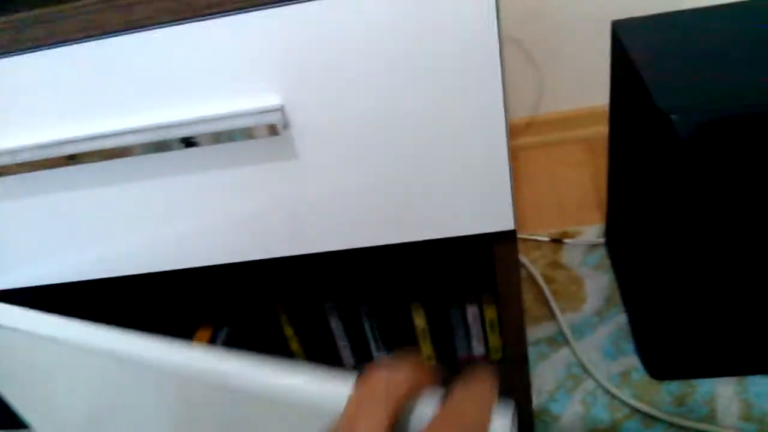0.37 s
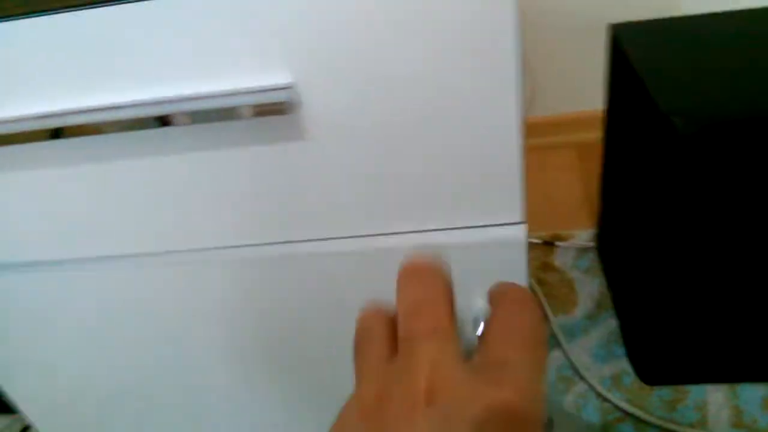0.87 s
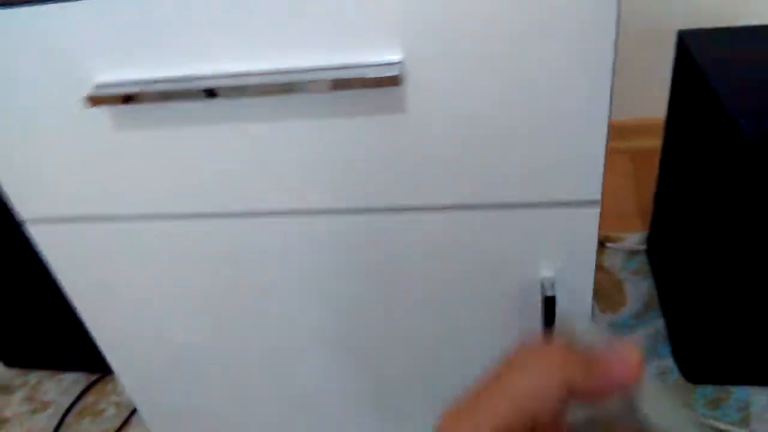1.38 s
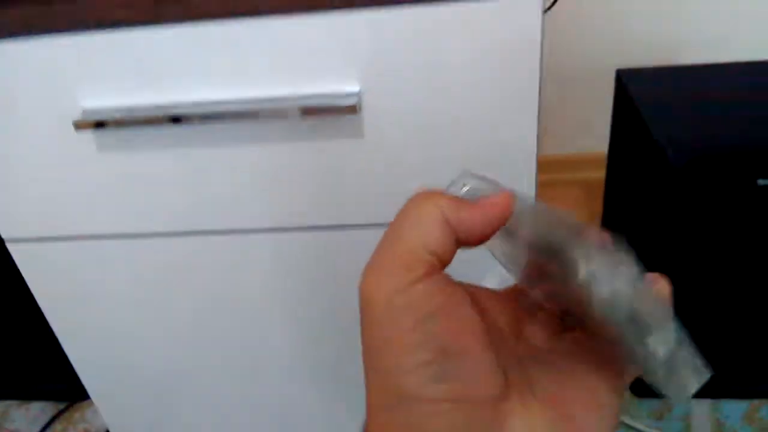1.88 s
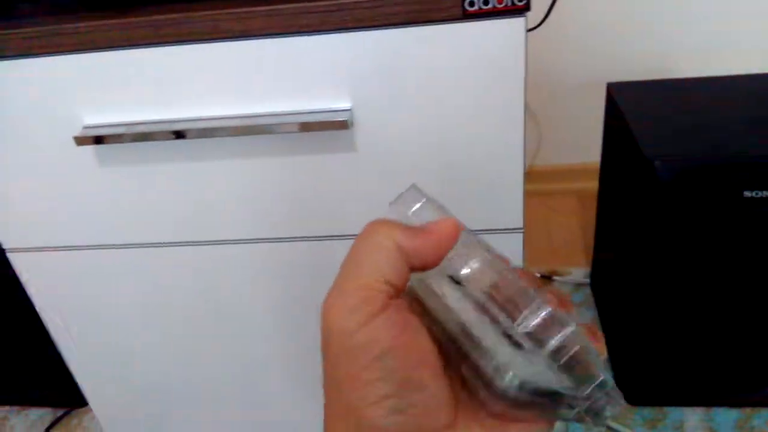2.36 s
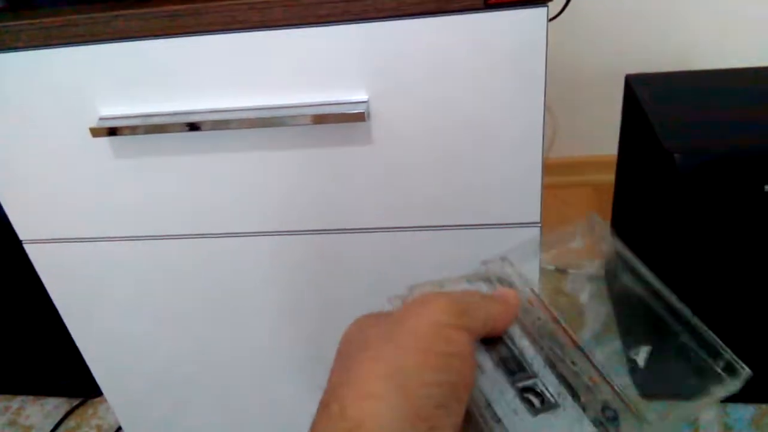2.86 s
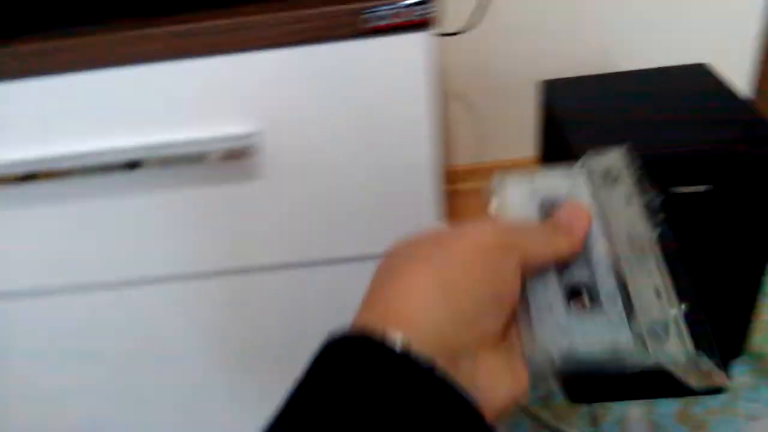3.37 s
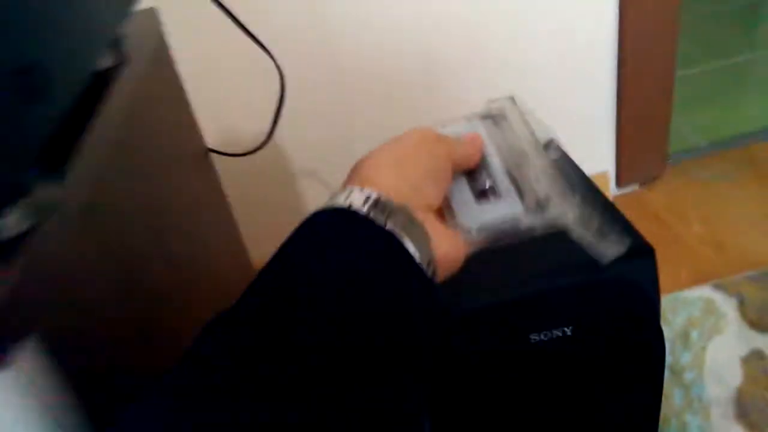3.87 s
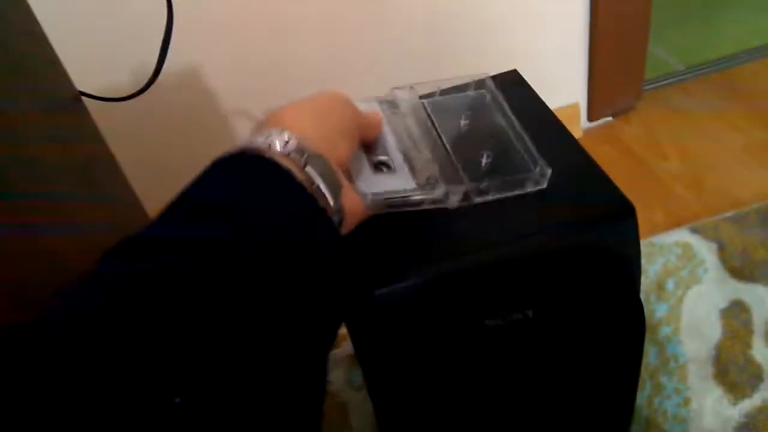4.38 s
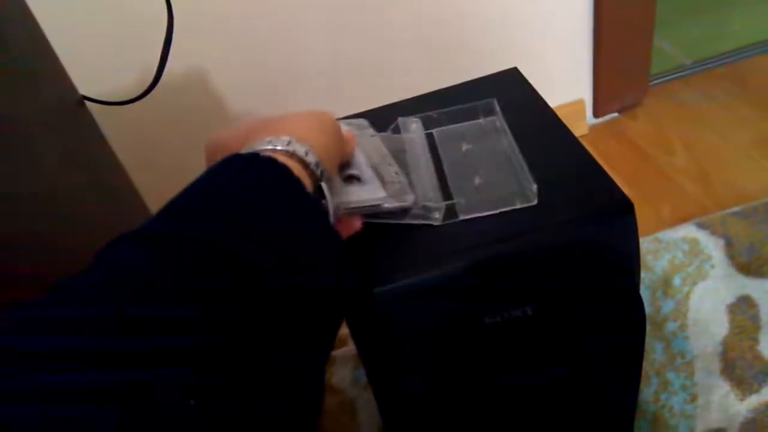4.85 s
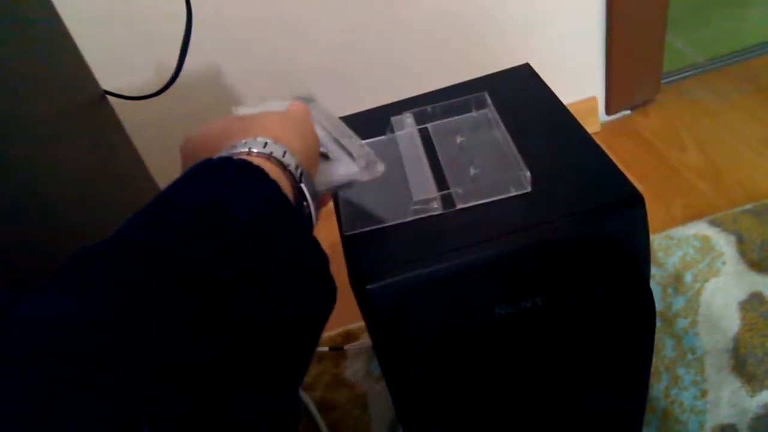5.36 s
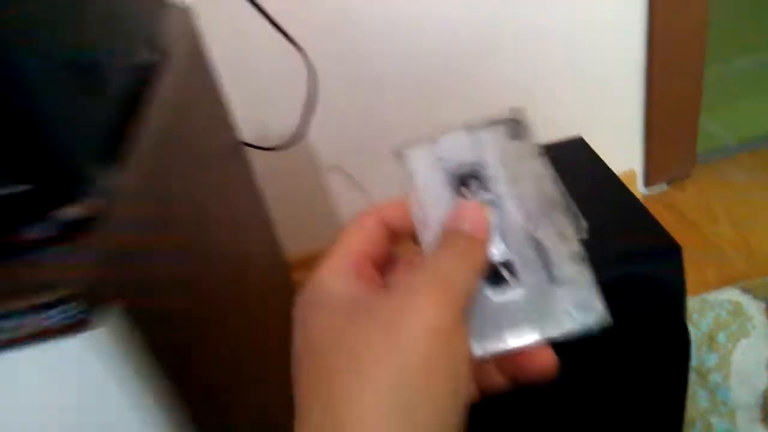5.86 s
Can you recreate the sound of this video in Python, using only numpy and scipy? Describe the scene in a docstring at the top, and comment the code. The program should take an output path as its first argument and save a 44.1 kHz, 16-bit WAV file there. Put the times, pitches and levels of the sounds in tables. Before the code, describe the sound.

In a small hard room, a cabinet door gives a faint knock, then slams loudly with a cracking, hollow thud. A hand lightly taps and turns a thin plastic cassette case, snaps it open, sets it on a hollow box and slides the cassette out with soft scrapes and clicks. A distant fan hums throughout under faint hiss and a thin high whine. Close handheld stereo microphone.

```python
"""A panel door knocks, swings and slams shut on its cabinet in a small hard room: noisy cracks set
its panel and cavity ringing. Then a hand turns a thin plastic cassette case, snaps it open, sets it on a
hollow box and slides the cassette out: tiny impacts and rubbing grains excite the plastic's resonances.
A fan hums and rushes far off in tones and noise, under a thin high whine that flickers."""
import sys
import numpy as np
from scipy import signal
from scipy.fft import rfft, irfft
from scipy.io import wavfile

SR = 44100
rng = np.random.default_rng(int(sys.argv[2]) if len(sys.argv) > 2 else 0)


def gain_from_decibels(decibels):
    """Convert decibel values to linear amplitude factors."""
    exponent = np.asarray(decibels, float) / 20
    return 10 ** exponent


def bounce(signal):
    """Save signal as a 16-bit WAV file at the path given by the first command-line argument."""
    frames = np.transpose(np.atleast_2d(signal))
    limited = np.clip(frames, -1, 1)
    pcm = np.round(limited * 32767).astype(np.int16)
    wavfile.write(sys.argv[1], SR, pcm)


N = 275182   # length in samples

# resonances of case shell, lid and the box under it: (f/Hz, relative width/Hz, relative level/dB)
CASE_MODES = [(504, 102, -4), (733, 149, -5), (1000, 427, -2.5), (1102, 420, -2.5), (1250, 110, -1),
              (1500, 390, -10), (1795, 307, -1.5), (2533, 296, 1.5), (3500, 1200, -12), (3650, 125, 1.5),
              (4470, 2950, -0.5), (5500, 290, 3.5), (6050, 192, -1.5), (7190, 730, -1.5), (7850, 370, 4.5),
              (8680, 320, 4), (9250, 350, -1), (10750, 1650, -7.5), (12100, 1200, -53)]
# how alike the background is at left and right: (f/Hz, likeness from -1 to 1)
AIR_LIKENESS = [(60, 0.72), (240, 1), (950, 0.36), (3750, -0.021), (14900, -0.1)]


def at_hz(points, hz):
    """Read a table on a log-frequency axis."""
    table = np.array(points)
    return np.interp(np.log(hz), np.log(table[:, 0]), table[:, 1])


def rms_one(x):
    """Scale to unit rms."""
    return x / np.sqrt(np.mean(x ** 2) + 1e-20)


def drift(rate_hz):
    """Random wander of spread 1; a higher rate forgets its past sooner."""
    knots_per_s = 40
    knots = rng.standard_normal(int(N / SR * knots_per_s) + 400)
    memory = np.exp(-2 * np.pi * rate_hz / knots_per_s)
    slow = signal.lfilter([1], [1, -memory], knots)[398:]   # skip the filter's start
    return np.interp(np.arange(N) / SR * knots_per_s, np.arange(len(slow)), rms_one(slow))


def bands(size, likeness):
    """Third-octave bands of stereo noise with their centres, built from a shared and an opposed part."""
    edges = 25 * 2 ** np.arange(0, 9.5, 1 / 3)
    white = rng.standard_normal((2, 2, size))
    for k, (low, high) in enumerate(zip(edges, edges[1:])):
        band_filter = signal.butter(2, [low, high], "band", fs=SR, output="sos")
        mid, side = signal.sosfilt(band_filter, white[k % 2])   # neighbours use different noise
        hz = np.sqrt(low * high)
        alike = np.clip(at_hz(likeness, hz), -1, 1)
        yield hz, np.sqrt((1 + alike) / 2) * mid + np.sqrt((1 - alike) / 2) * side * [[1], [-1]]


def coloured(x, db_at, lag_s=0.):
    """Filter channels by a dB function of frequency; the left one may lag."""
    hz = np.fft.rfftfreq(x.shape[-1], 1 / SR) + 1e-3
    lag = np.exp(-2j * np.pi * hz * [[lag_s], [0]])
    return irfft(rfft(x) * gain_from_decibels(db_at(hz)) * lag, x.shape[-1])


def chatter(hz, contact_ms, rise_share=0.12):
    """Spectrum of a cluster of micro-impacts that swells, dies, and excites all pitches about evenly."""
    t = np.arange(2 * len(hz) - 2) / SR * 1000 / contact_ms   # time in contact lengths
    shape = np.sqrt((1 - np.exp(-t / rise_share)) * np.exp(-t))
    cluster = rfft(rng.standard_normal(len(t)) * shape ** 2)
    cluster = irfft(cluster / np.abs(cluster)) * shape   # even out the pitches, then shape again
    return rfft(rms_one(cluster) * np.sqrt(np.mean(shape ** 4)))


def add(out, s, sound):
    """Mix a sound in at time s."""
    i = round(s * SR)
    out[:, i:i + sound.shape[1]] += sound[:, :N - i]


def door(unlike=0.97, lag_s=0.00018, bend_s=0.0014, tick_hz=7500, contact_ms=2.83):
    """Each blow cracks broadly and sets panel and cavity ringing; the door stands to the right of the ports."""
    # blows: (t/s, crack peak/dB, tilt/dB per octave, panel ring level/dB, hinge tick level/dB)
    blows = [(0.0843, -21, -1, -62.5, 28), (0.0918, -29, -4, -58, 1), (.9820, -3.5, 4, -26, -4.5),
             (.9870, -12, -5.5, -38.5, -5), (.994, -17.5, 6.5, -29, 15), (1.0009, -23, -9, -34, 0)]
    # colour of the crack: (f/Hz, relative level/dB per Hz)
    crack_colour = [(88, -27), (150, 5.5), (299, 0), (455, -6), (720, 3.5), (1000, 9), (1670, 5.5),
                    (1950, 6.5), (2850, 0), (3900, -4.5), (5160, -3.5), (6020, -9.5), (9340, -19),
                    (13700, -47), (14500, -46)]
    # ringing of panel and cabinet cavity: (f/Hz, relative level/dB, time to fall 60 dB/s)
    modes = [(39.6, -26, 3.1), (61.5, -19, 1), (75.3, -12, 0.8), (98, -2, 0.45), (122.9, -7.5, 0.74),
             (169.4, -24, 0.54), (204.3, -4.5, 0.3), (261.2, -15.5, 0.24), (306.4, -23.5, 0.55),
             (685, -38.5, 0.2), (741, -15, 0.18), (808, -8, 0.11), (888, -27.5, 0.32), (925, -18, 0.27),
             (970, -18, 0.16), (1263, -7.5, 0.38), (1363, -30, 0.15), (1520, -17, 0.1), (1660, -13, 0.14),
             (1825, -18.5, 0.39)]
    out, hz, t = np.zeros((2, N)), np.fft.rfftfreq(8192, 1 / SR) + 1, np.arange(2 * SR) / SR
    rings = sum(gain_from_decibels(db - 60 * t / t60) * np.sin(2 * np.pi * mode_hz * t) for mode_hz, db, t60 in modes)
    rings *= 1 - np.exp(-t / bend_s)   # the panel takes a few ms to bend
    low_cut = signal.butter(2, 120, "high", fs=SR, output="sos")
    for s, db, tilt, ring_db, tick_db in blows:
        sides = chatter(hz, contact_ms) + unlike * np.array([chatter(hz, contact_ms) for side in "LR"])
        colour_db = at_hz(crack_colour, hz) + tilt * np.log2(np.maximum(hz, 250) / 1000)
        colour_db += tick_db / (1 + (tick_hz / hz) ** 4)   # the hinge tick acts on the treble
        crack = signal.sosfilt(low_cut, irfft(sides * gain_from_decibels(colour_db))[:, :4096])
        add(out, s, gain_from_decibels(db) * crack / np.abs(crack).max())
        add(out, s + 0.002, gain_from_decibels(ring_db) * rings * np.ones((2, 1)))
    return coloured(out, np.zeros_like, lag_s)


def swing():
    """Low turbulent puffs through the cavity's lowest resonances."""
    # puffs: (t/s, level/dB)
    puff_rows = [(.2, -72), (.52, -66), (.745, -69), (.85, -75)]
    rise_s, fall_s = 0.016, 0.074   # time to change by a factor e
    t = np.arange(N) / SR
    cavity = signal.butter(2, [80, 140], "band", fs=SR, output="sos")
    puffs = signal.sosfilt(cavity, rng.standard_normal(N))
    swell = sum(gain_from_decibels(db) * np.exp(-np.maximum((s - t) / rise_s, (t - s) / fall_s)) for s, db in puff_rows)
    return rms_one(puffs) * swell


def resonances(hz, centre_hz, width_hz):
    """Responses of damped modes (rows) at the frequencies hz, applied twice for steep skirts; gain 1 on top."""
    centre = np.c_[centre_hz]
    width = np.c_[width_hz] * 1.55   # makes up for the narrowing by the square
    return (1j * hz * width / (centre ** 2 - hz ** 2 + 1j * hz * width)) ** 2


def case_response(hz, colour_db, scatter_db, damping=0.93):
    """The case's modes, struck with fresh strengths and heard a little differently at each port."""
    centre, width, level_db = np.transpose(CASE_MODES)
    shared = rng.normal(0, scatter_db, len(centre))
    own = rng.normal(0, scatter_db / 2, (2, len(centre)))
    strength = gain_from_decibels(level_db + colour_db + shared + own)
    angle = rng.normal(0, 0.78, len(centre)) * np.clip(centre / 3000, 0, 1.2)   # radians
    turn = np.exp(1j * angle * [[1], [-1]])
    signs = (-1.) ** np.arange(len(centre))   # neighbouring modes start in opposite directions
    return (strength * turn * signs) @ resonances(hz, centre, width * damping)


def landings():
    """Contact rows of the case landing on the box; rattle and rebound follow the second corner."""
    # landings: (t/s, first corner level/dB, second corner level/dB), both relative
    times = [(4.2342, -22.5, -27), (4.7137, -27, -26.5)]
    # two corners, a rattle and a rebound, levels relative to the corner:
    # (delay/s, knock level/dB, knock f/Hz, tick level/dB, tick f/Hz)
    pattern = [(0, 3, 1440, -2, 7640), (.0033, 8, 620, 0.5, 4900), (0.0129, 2, 1500, -13.5, 3770),
               (.086, 0.5, 590, -43, 3000)]
    rows = []
    for s, first, second in times:
        for delay, knock, knock_hz, tick, tick_hz in pattern:
            corner = second if delay else first
            rows.append((s + delay, knock + corner, knock_hz, tick + corner, tick_hz))
    return rows


def contacts(level_db=4):
    """A slow shell knock and a quick hard-edge tick chatter into the case, waking modes near their pitch."""
    # contacts: (t/s, relative knock level/dB, knock f/Hz, relative tick level/dB, tick f/Hz)
    touches = [(1.2795, -53, 1803, -53, 4805), (1.3803, -31.5, 1400, -47.5, 3414),
               (1.4268, -36.5, 1250, -80, 3000), (1.5742, -39, 1144, -53, 6500),
               (1.595, -40, 1206, -58, 4500), (2.1394, -35.5, 1050, -73, 3000),
               (2.1598, -45, 1150, -46, 3000), (2.3508, -39, 1500, -34, 8600),
               (2.353, -20, 1700, -39, 6000), (2.3559, -18, 1210, -28.5, 5000),
               (2.3857, -33, 1200, -32, 7100), (2.3884, -22.5, 1170, -35.5, 2800),
               (2.8416, -33, 1250, -59, 7000), (2.8525, -40, 1400, -29, 5300),
               (2.8774, -40, 1250, -38.5, 6000), (2.881, -36, 1250, -45, 5500),
               (3.1237, -38, 1180, -55, 6000), (3.1516, -55, 1200, -49, 6060),
               (3.2529, -25, 1236, -42, 3500), (4.57, -37, 850, -46, 7320), (4.9409, -28, 700, -66, 3000),
               (5.0397, -29, 700, -59, 3000), (5.0497, -21, 700, -55, 3000), (5.0614, -26, 704, -43, 4000),
               (5.0805, -41, 700, -41, 8000), (5.0864, -29.5, 700, -42.5, 3000),
               (5.1981, -33, 1000, -45.5, 6800), (5.2, -30.5, 2550, -34.5, 3970),
               (5.2166, -31.5, 1890, -46, 6500), (5.2237, -25, 740, -58, 2580)]
    knock_skirt, tick_skirt = 23.5, 6.5   # dB lost per octave squared from the pitch
    knock_ms, tick_ms = 3.94, 3.2         # contact lengths
    out, hz, centre = np.zeros((2, N)), np.fft.rfftfreq(4096, 1 / SR), np.array(CASE_MODES)[:, 0]
    for s, knock_db, knock_hz, tick_db, tick_hz in touches + landings():
        for db, pitch, skirt, ms in [(knock_db, knock_hz, knock_skirt, knock_ms),
                                     (tick_db, tick_hz, tick_skirt, tick_ms)]:
            colour = db - skirt * np.log2(centre / pitch) ** 2
            struck = irfft(chatter(hz, ms) * case_response(hz, colour, scatter_db=2.5))
            add(out, s - .0005, gain_from_decibels(level_db) * struck)
    return out


def slides():
    """Dense stick-slip grains excite the skin-damped case; each stroke has its own tilt from dull to bright."""
    # strokes of fingers and cassette: (peak t/s, rise/s, fall/s, relative peak level/dB, tilt/dB per octave)
    stroke_rows = [(1.585, 0.033, 0.047, -50.5, -3.5), (2.163, .015, 0.047, -48, -4.5),
                   (2.348, 0.022, .006, -40, 2.5), (2.602, 0.053, 0.03, -49, -0.5),
                   (2.653, 0.03, 0.036, -43.5, 0), (2.792, 0.1, 0.086, -47, 1.5),
                   (2.845, 0.045, 0.031, -40, -2), (2.885, 0.025, 0.03, -53, -1.5),
                   (3.135, 0.11, 0.043, -52, 0.5), (3.197, 0.0073, 0.019, -49.5, -4.5),
                   (4.49, 0.45, 0.096, -54, -6.5), (4.85, 0.45, 0.033, -56.5, -5),
                   (4.991, 0.2, 0.068, -47, -2.5), (5.055, 0.035, 0.12, -51, -7),
                   (5.114, 0.061, 0.14, -59, 0.5), (5.21, .01, 0.042, -46, -5)]
    # bands in which each stroke has its own strength: (low f/Hz, high f/Hz)
    slide_bands = [(400, 1000), (1000, 2500), (2500, 5500), (5500, 12000)]
    fade_db = 30   # change over one rise or fall time
    out, hz, centre = np.zeros((2, N)), np.fft.rfftfreq(2048, 1 / SR), np.array(CASE_MODES)[:, 0]
    present = rng.random(N) < 5000 / SR   # about 5000 grains a second
    strength = gain_from_decibels(2.5 * np.minimum(rng.exponential(1, N), 4))
    grains = present * strength * rng.choice([-1, 1], N)
    t = np.arange(N) / SR
    strokes = [gain_from_decibels(db - fade_db * np.maximum((s - t) / rise, (t - s) / fall))
               for s, rise, fall, db, tilt in stroke_rows]
    tilts = np.array(stroke_rows)[:, -1]
    for low, high in slide_bands:
        inside = np.where((centre >= low) & (centre <= high), 0, -80)   # dB
        response = irfft(case_response(hz, inside, scatter_db=2.0, damping=3.6))
        rubbed = signal.fftconvolve(grains[None], response)[:, :N]
        out += rubbed * (gain_from_decibels(tilts * np.log2(low / 2000)) @ strokes)
    return gain_from_decibels(-2) * out


def room(x, gap_ms=0.28, build_ms=4):
    """Dense reflections: noise that dies band by band."""
    # reflections: (f/Hz, time to fall 60 dB/s, relative level/dB)
    rows = np.array([(60, 0.83, -8.5), (199, 0.6, -2), (700, 0.51, 3), (1500, 0.57, -1), (3000, 0.52, 2),
                     (5000, 0.48, -3), (8000, 0.41, 0.5), (11100, 0.44, -8.5)])
    t = np.arange(SR) / SR
    likeness = [(60, 0.99), (250, 1.0), (600, 0.9), (1500, 0.09), (15000, 0.038)]   # (f/Hz, left-right likeness)
    tail = sum(band * gain_from_decibels(at_hz(rows[:, ::2], hz) - 60 * t / at_hz(rows, hz))
               for hz, band in bands(size=SR, likeness=likeness))
    tail *= np.clip((t * 1000 - gap_ms) / build_ms, 0, 1)
    return signal.fftconvolve(x, tail / np.sqrt(np.sum(tail ** 2) / 2), axes=1)[:, :N]


def hum(wander_hz=2.046):
    """Fan tones waver in level and slightly in pitch."""
    # tones: (f/Hz, level/dB rms)
    tones = [(157.5, -84), (316.5, -74.5), (473, -78), (630, -76.5), (788, -76.5), (910, -88), (945, -75.5),
             (1416, -85), (1705, -80.5), (2358, -81.5)]
    out = np.zeros((2, N))
    for hz, db in tones:
        phase = 2 * np.pi * np.cumsum(hz + wander_hz * drift(4.96)) / SR
        # the ports hear high tones out of step
        lead = np.arccos(np.clip(at_hz(AIR_LIKENESS, hz), -1, 1)) / 2
        out += np.sqrt(2) * gain_from_decibels(db + 2 * drift(2.6)) * np.sin(phase + [[lead], [-lead]])
    return out


def air():
    """Far fan rush and microphone hiss: coloured noise, gently patchy."""
    # colour: (f/Hz, relative level/dB per Hz)
    colour = [(25, -56), (45, -8.5), (70, 1), (115, -11), (160, -9.5), (225, -8), (300, 2), (400, 4),
              (565, 2), (700, -0.5), (900, 7.5), (1330, -3.5), (1820, -0.5), (3000, -2), (4770, -5.5),
              (7720, -7), (11000, -8), (14500, -27)]
    rush = sum(band * gain_from_decibels(.5 * drift(9.6)) for hz, band in bands(size=N, likeness=AIR_LIKENESS))
    return rms_one(coloured(rush, lambda hz: at_hz(colour, hz))) * gain_from_decibels(-62.5)


def whine():
    """A thin high tone, out of step at the two ports, whose level flickers quickly."""
    phase = 2 * np.pi * 14002 * np.arange(N) / SR
    level_db = -78.5 + 3 * drift(40.0) + 2.5 * drift(.6)   # quick flicker and slow wander
    return gain_from_decibels(level_db) * np.sin(phase + [[.8], [-.8]])


def scene():
    """Door and case with their reflections over the room's steady air."""
    shut, handled = door(), contacts() + slides()
    # the case is held close, then from 3.8 s laid on the box farther off: more reflections
    wet_db = np.where(np.arange(N) / SR < 3.8, -10.5, -5.5)
    reflected = room(gain_from_decibels(-5.5) * shut + gain_from_decibels(wet_db) * handled)
    return shut + handled + reflected + swing() + air() + hum() + whine()


def roll_off(x):
    """The treble ends steeply here."""
    return signal.sosfilt(signal.butter(12, 15490, fs=SR, output="sos"), x)


def record(dry):
    """The two microphone ports differ in colour, and the top is cut."""
    # balance of the ports: (f/Hz, left minus right level/dB)
    balance = [(60, 0.5), (300, 1), (700, 1.5), (1200, 3), (2400, 2.5), (4400, 0), (8000, 12.5), (12000, 0),
               (14900, -7.5)]
    ports = coloured(dry, lambda hz: at_hz(balance, hz) / 2 * [[1], [-1]])
    top_cut = signal.cheby2(8, 35, 15200, fs=SR, output="sos")   # 35 dB down from 15200 Hz
    ports = signal.sosfilt(top_cut, ports)
    return roll_off(ports)


dry = scene()
out = record(dry)
bounce(out)
```